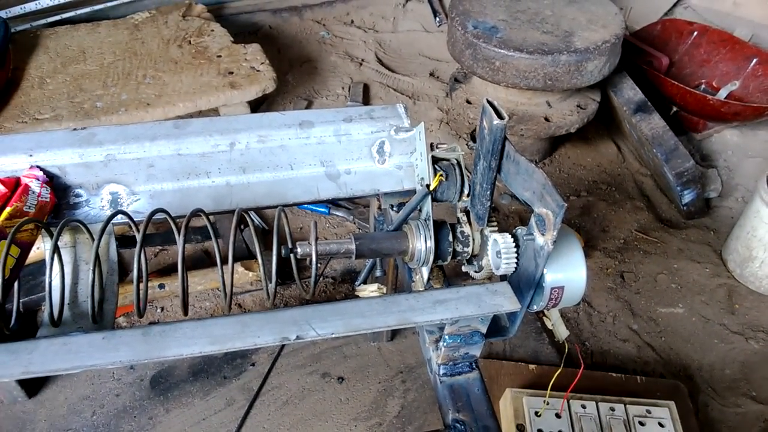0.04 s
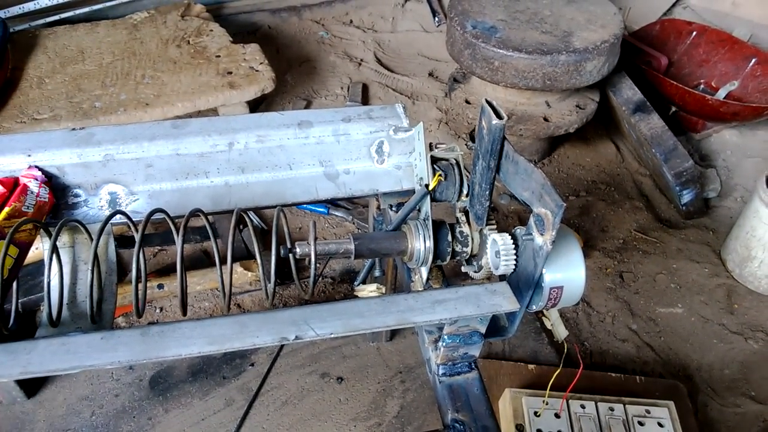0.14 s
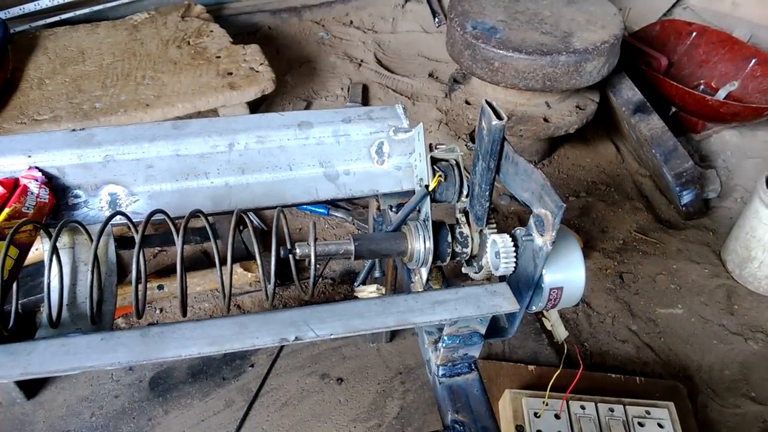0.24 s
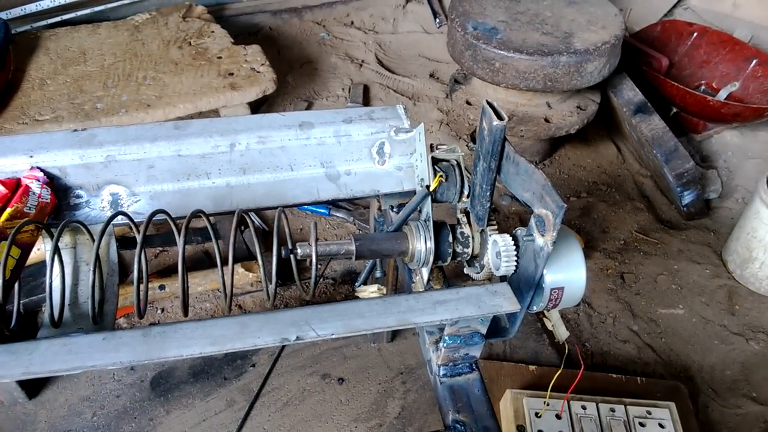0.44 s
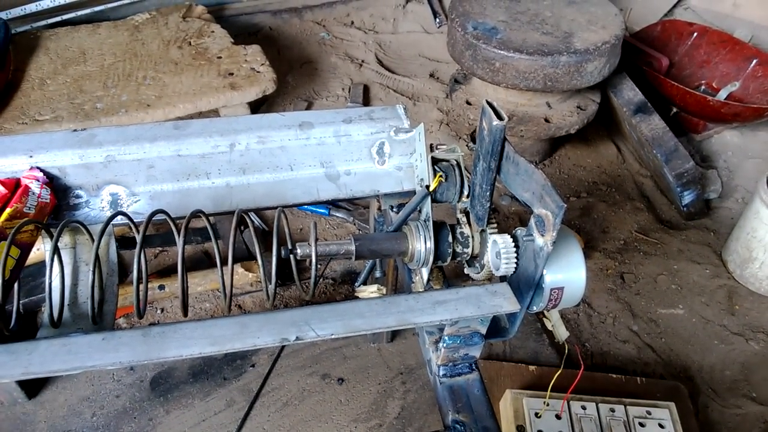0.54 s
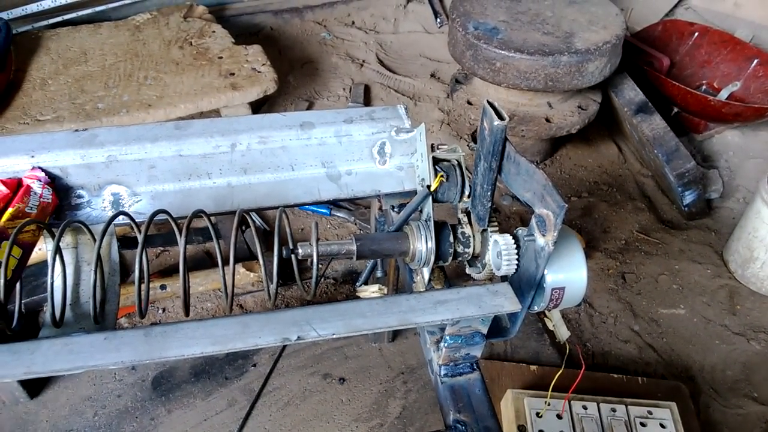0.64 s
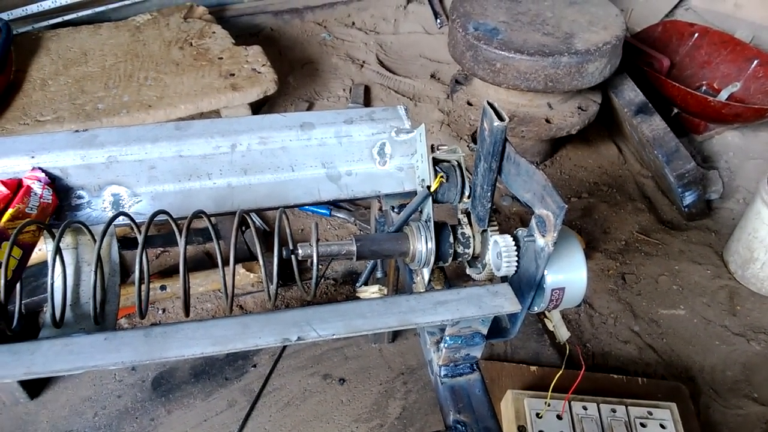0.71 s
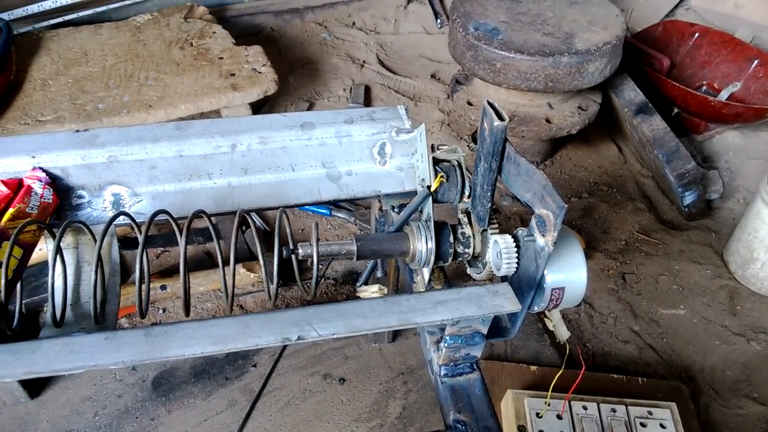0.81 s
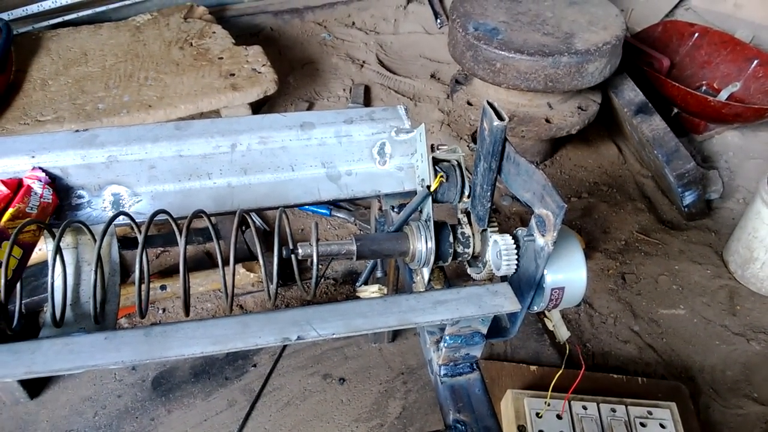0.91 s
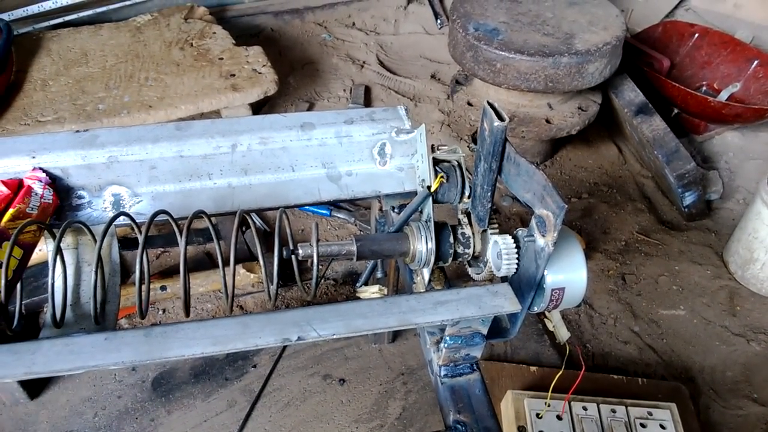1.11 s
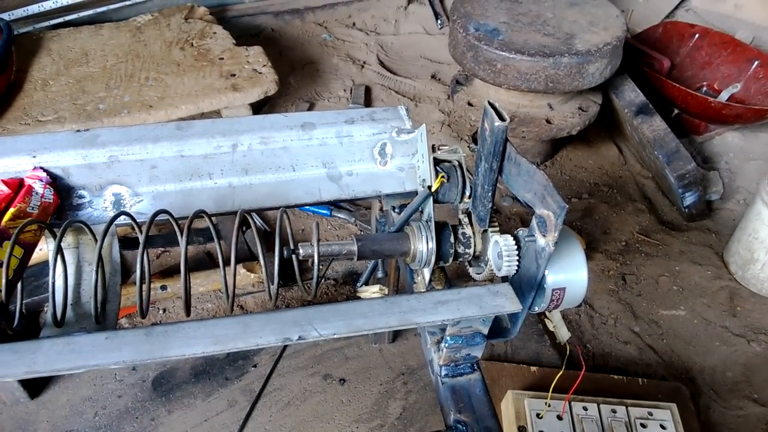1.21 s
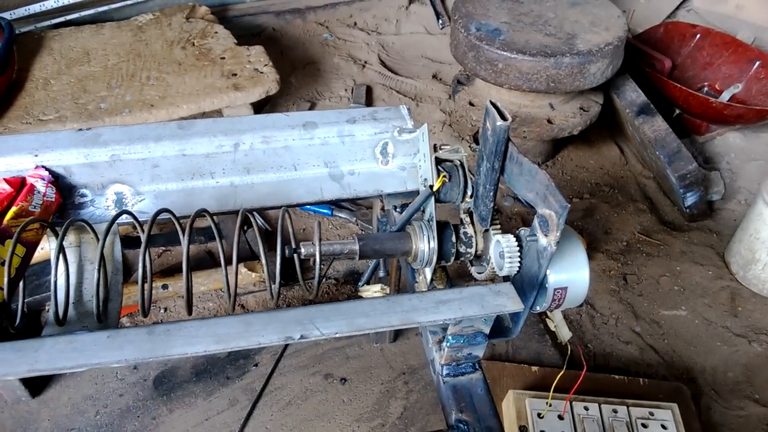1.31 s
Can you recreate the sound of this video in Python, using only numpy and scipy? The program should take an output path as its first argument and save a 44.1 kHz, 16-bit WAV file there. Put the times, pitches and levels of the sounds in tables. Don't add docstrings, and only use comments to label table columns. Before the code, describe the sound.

After a short quiet rumble, a harsh burst of gear grinding, whirring and clattering loose metal, bright and dry with a short room echo, quickly dies away into faint distant traffic, heard close on a phone.

```python
import sys
import numpy as np
from scipy import signal
from scipy.io import wavfile
from scipy.ndimage import uniform_filter1d

SR = 44100
rng = np.random.default_rng(int(sys.argv[2]) if len(sys.argv) > 2 else 0)


def makeup_ratio(level_db):
    decades = np.asarray(level_db, float) / 20
    return 10 ** decades


def pcm_store(signal):
    levels = np.round(np.clip(np.atleast_2d(signal), -1, 1) * 32767)
    wavfile.write(sys.argv[1], SR, levels.astype(np.int16).T)


N = 59535

# f/Hz, level per Hz/dB
TRAFFIC_TONE = [(15, -45), (25, -11.5), (97, -3), (170, -8.5), (211, -9), (560, -22.5), (886, -14.5),
                (1130, -24.5), (16000, -62)]
# f/Hz, width/Hz, level/dB
RUMBLE = [(87.7, 14, -5.5), (102.7, 22, -7.5), (321, 82, -9), (942, 190, -13)]
# t/s, level/dB
SWELL = [(0, 1), (.12, -1.5), (.21, 0.5), (.3, 2.5), (.7, 0), (.8, 2.3), (.87, 0.5), (.95, 3.5),
         (1.04, 0.5), (1.08, -1), (1.14, 2.5), (1.19, -3), (1.24, -1), (1.31, 1), (1.35, 4.5)]
# t/s, grind level/dB, brightness/dB
EFFORT = [
    (0.23, -74.5, 4),
    (0.231, -47.5, 4),
    (0.246, -34.5, 4),
    (.30, -42.5, 6.5),
    (0.432, -39.5, 2),
    (.55, -41, 6),
    (0.614, -42, 4.5),
    (0.691, -55.5, -0.5),
    (0.713, -65, -20.5),
]
# t/s, bracket level/dB, coil level/dB, sheet level/dB, frame thud level/dB
KNOCKS = [(0.2378, -37.5, -38, -51, -48), (.2420, -36.5, -36.5, -37, -46), (0.2451, -40, -30.5, -23, -61),
          (.2945, -66, -44, -46, -45.5), (0.3077, -37, -29, -32, -71), (.3185, -33.5, -33.5, -36, -74),
          (0.3536, -31.5, -46, -34.5, -63), (0.366, -33.5, -38, -34.5, -53),
          (0.3719, -31.5, -36, -34.5, -49.5), (.3828, -30.5, -30.5, -32.5, -44.5),
          (.4010, -48, -38, -66, -63), (0.414, -38, -37, -48, -81), (0.4415, -44, -40, -35, -75),
          (0.453, -33.5, -29.5, -31.5, -73), (0.4937, -34.5, -32, -30, -70), (0.5032, -32, -40, -31.5, -57),
          (.5195, -49, -33, -34, -63), (.5355, -39, -32, -32, -63), (.5710, -35, -40, -41, -77),
          (0.587, -39, -42.5, -46, -87), (.6030, -37, -47, -39.5, -70), (.8330, -76, -68.5, -72, -63),
          (0.851, -78.5, -70.5, -78.5, -83), (1.335, -66, -74.5, -84.5, -84)]
# f/Hz, level/dB, time to fade by 60 dB/s
BRACKET = [(1750, -9, .025), (2545, -4, .04), (2612, -2, .05), (2715, -2, .03), (3020, -3, .015),
           (3330, -3, .02), (3800, -7, .015)]
COIL = [(4295, -6, .03), (4607, -4, .07), (5460, -5, .02), (5685, -2, .02), (6250, -5, .015),
        (6820, -2, .025), (6965, -3, .03), (7085, -3, .03), (7225, -1, .03), (7465, -1, .03),
        (7620, -3, .02), (8200, -6, .015)]
SHEET = [(8650, -6, .02), (9210, -6, .03), (10195, -1, .02), (10400, 0, .015), (10600, -2, .015),
         (11000, -2, .012), (11250, -2, .015), (11700, -3, .01), (12300, -3, .015), (12700, -5, .015),
         (13900, -4, .015), (14075, -5, .02)]
FRAME = [(75, -2, .15), (265, -12, .08), (308, 0, .1), (355, -1, .08), (400, -3, .08), (453, 0, .12),
         (515, -1, .14), (685, -9, .08), (900, -8, .08), (1150, -9, .06)]
# lowest f/Hz, highest f/Hz, level against rings/dB, grind level/dB,
# share of the motor's brightness/ratio
BODIES = [
    (1350, 4200, 7, -5, 0.38),
    (4000, 7700, 6, -5.06, 0.91),
    (8700, 16000, 6, -8.5, 1.32),
]

TOP_HZ = 15780


def unit(x):
    return x / np.sqrt(np.mean(x ** 2))


def band(x, lo_hz, hi_hz):
    return signal.sosfilt(signal.butter(2, [lo_hz, hi_hz], "bandpass", fs=SR, output="sos"), x)


def fade_factor(t60_s):
    return np.exp(-np.log(1000) / (t60_s * SR))


def wander(per_s):
    hold = int(SR / per_s)
    steps = np.repeat(rng.standard_normal(N // hold + 1), hold)
    smooth = uniform_filter1d(uniform_filter1d(steps, hold), hold)
    return unit(smooth[:N])


def traffic(t):
    level_db, flicker_db, rumble_flicker_db = -46, 0.8, 2.6
    tone_hz, tone_db = np.array(TRAFFIC_TONE).T
    wash = 0
    for hz in 25 * 2 ** np.arange(0, 9.3, .5):
        db = np.interp(np.log(hz), np.log(tone_hz), tone_db) + flicker_db * wander(10)
        wash = wash + makeup_ratio(db) * band(rng.standard_normal(N), hz * .84, hz * 1.19)
    out = unit(wash)
    for hz, width, db in RUMBLE:
        hum = unit(band(rng.standard_normal(N), hz - width / 2, hz + width / 2))
        out = out + makeup_ratio(db + rumble_flicker_db * wander(18)) * hum
    return unit(out) * makeup_ratio(level_db + np.interp(t, *np.array(SWELL).T))


def room(x, t):
    level_db, split_hz = -11, 4180
    low_t60_s, top_t60_s, build_up_s = 0.34, 0.13, 0.007
    tail = t[:SR // 2]
    noise = rng.standard_normal((2, len(tail)))
    low = band(noise[0], 1300, split_hz) * makeup_ratio(-60 * tail / low_t60_s)
    top = band(noise[1], split_hz, TOP_HZ) * makeup_ratio(-60 * tail / top_t60_s)
    echo = (low + top) * np.clip(tail / build_up_s, 0, 1)
    echo = echo / np.sqrt(np.sum(echo ** 2))
    return makeup_ratio(level_db) * signal.fftconvolve(x, echo)[:N]


def ticks(per_s):
    scatter_db = 2.2
    chance, side, size = rng.random((3, N))
    happens = chance < per_s / SR
    return unit(happens * np.sign(side - .5) * makeup_ratio(-scatter_db * np.log(size + 1e-9)))


def strikes(column):
    x = np.zeros(N)
    for row in KNOCKS:
        x[int(row[0] * SR)] += makeup_ratio(row[column])
    return x


def rings(x, modes):
    wander_db, wander_per_s = 2.2, 40
    out = 0
    for hz, db, t60_s in modes:
        fade = fade_factor(t60_s)
        struck = x * np.sign(rng.standard_normal(N)) * makeup_ratio(db + wander_db * wander(wander_per_s))
        tone = signal.lfilter([1], [1, -fade * np.exp(2j * np.pi * hz / SR)], struck).imag
        out = out + np.sqrt(1 - fade * fade) * tone
    return out * np.sqrt(2 / sum(makeup_ratio(2 * db) for _, db, _ in modes))


def motor_effort(t):
    times, level_db, bright_db = np.array(EFFORT).T
    coast = np.exp(-np.maximum(t - times[-1], 0) / 0.015)
    effort = makeup_ratio(np.interp(t, times, level_db, left=-120)) * coast
    return effort, np.interp(t, times, bright_db)


def whirr(effort):
    return makeup_ratio(-7.5) * effort * unit(band(ticks(5400), 640, 1600))


def frame_thud(effort):
    thud_db, hum_db, shake_t60_s, push_s = -13, -31, .08, 0.00061
    shake = signal.lfilter([1], [1, -fade_factor(shake_t60_s)], strikes(column=4))
    shake = (makeup_ratio(thud_db) * shake + makeup_ratio(hum_db) * effort) * ticks(3000)
    push = np.hanning(int(push_s * SR) + 3)
    return np.convolve(rings(shake, FRAME), push)[:N]


def grind(effort, bright_db):
    patchy_db, patchy_per_s = 1.5, 120
    return makeup_ratio(bright_db + patchy_db * wander(patchy_per_s)) * effort * ticks(9000)


def chatter(column):
    level_db, t60_s, rise_s = 1, 0.035, .0009
    snap_db, snap_t60_s = 24, .012
    hits = strikes(column)
    rise = np.exp(-1 / (rise_s * SR))
    rattle = signal.lfilter([1 - rise], np.convolve([1, -fade_factor(t60_s)], [1, -rise]), hits)
    snap = signal.lfilter([1], [1, -fade_factor(snap_t60_s)], hits ** 2)
    return makeup_ratio(level_db) * (rattle + makeup_ratio(snap_db) * snap) * ticks(12000)


def machine(t):
    effort, bright_db = motor_effort(t)
    out = whirr(effort) + frame_thud(effort)
    for i, modes in enumerate((BRACKET, COIL, SHEET)):
        lo_hz, hi_hz, body_db, grind_db, share = BODIES[i]
        drive = grind(effort, grind_db + share * bright_db) + chatter(column=i + 1)
        out = out + rings(drive, modes) + makeup_ratio(body_db) * band(drive, lo_hz, hi_hz)
    return out


def scene():
    t = np.arange(N) / SR
    near = machine(t)
    return (near + room(near, t) + traffic(t))[None]


def band_limit(x):
    return signal.sosfilt(signal.butter(12, 16120, fs=SR, output="sos"), x)


def record(dry):
    hiss = makeup_ratio(-80) * rng.standard_normal(dry.shape)
    top_cut = signal.ellip(10, .2, 60, TOP_HZ, fs=SR, output="sos")
    mix = signal.sosfiltfilt(top_cut, dry + hiss)
    return band_limit(mix)


dry = scene()
out = record(dry)
pcm_store(out)
```